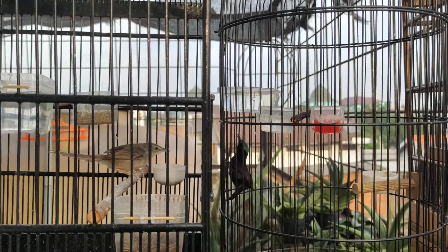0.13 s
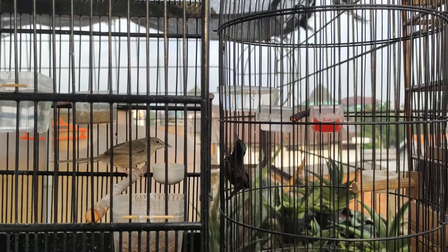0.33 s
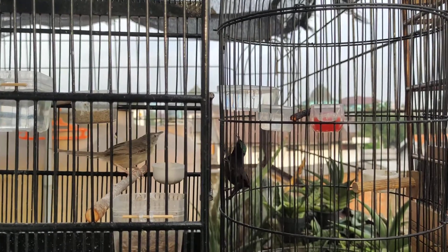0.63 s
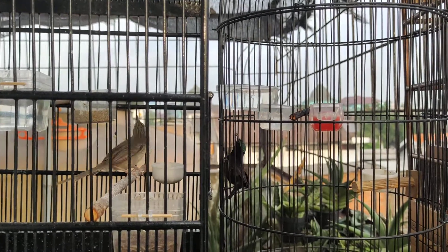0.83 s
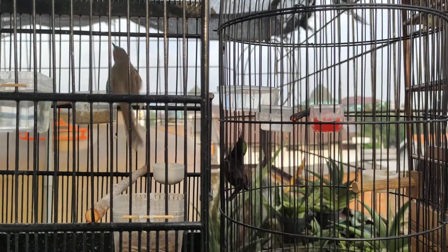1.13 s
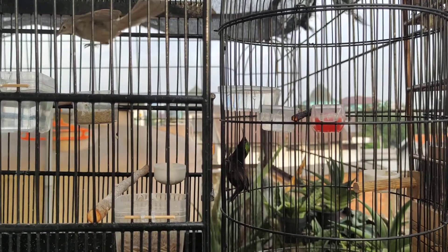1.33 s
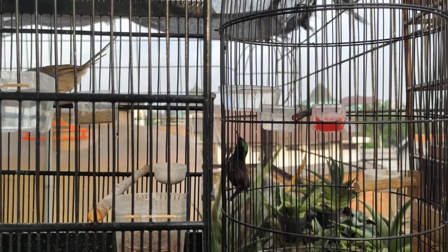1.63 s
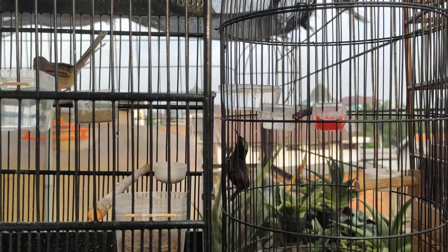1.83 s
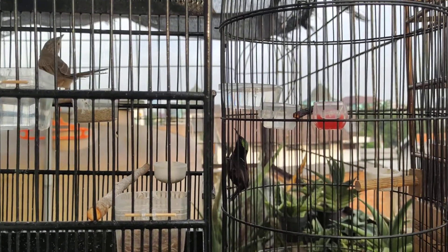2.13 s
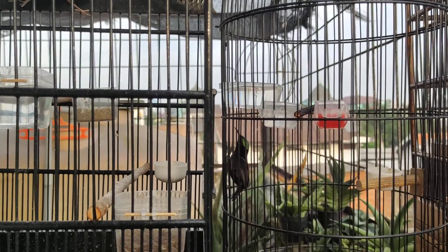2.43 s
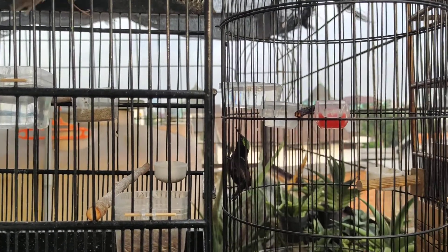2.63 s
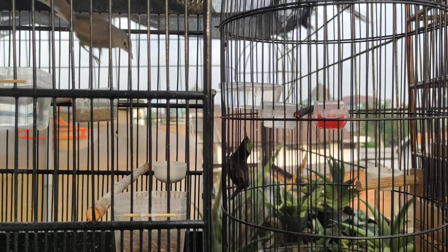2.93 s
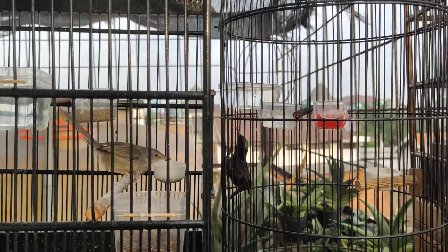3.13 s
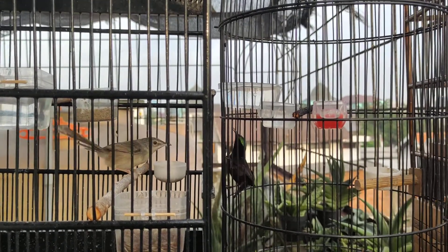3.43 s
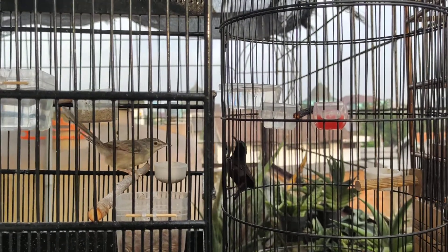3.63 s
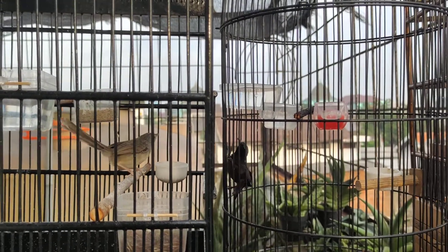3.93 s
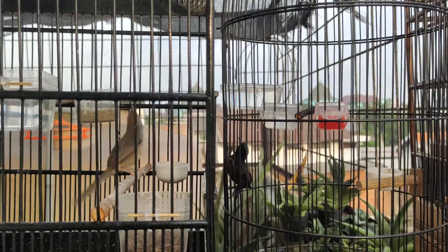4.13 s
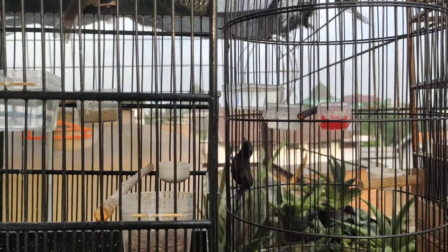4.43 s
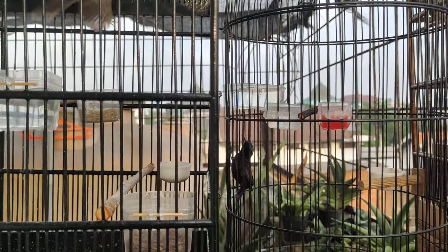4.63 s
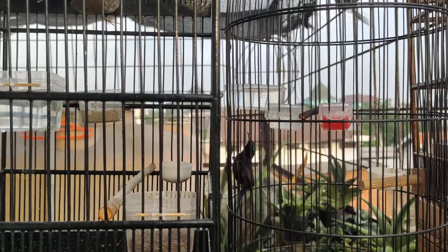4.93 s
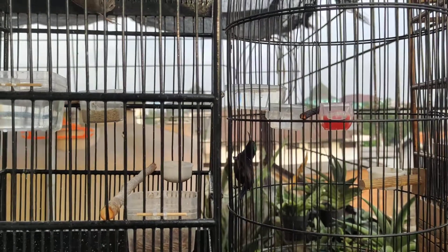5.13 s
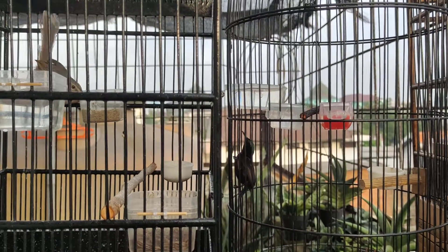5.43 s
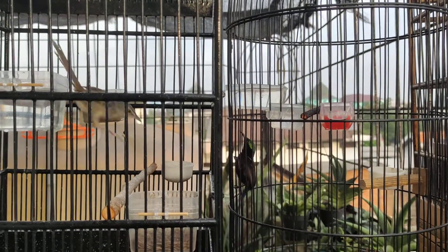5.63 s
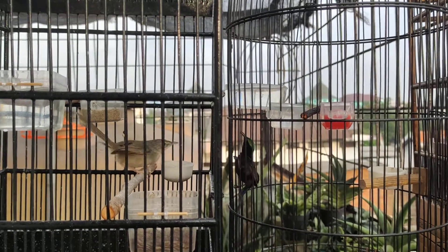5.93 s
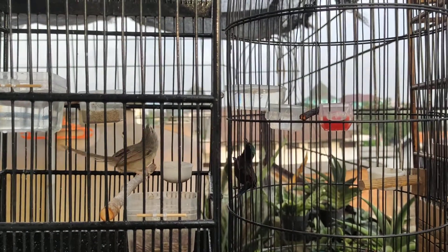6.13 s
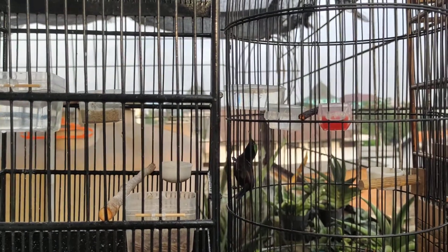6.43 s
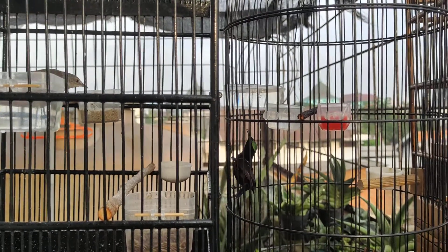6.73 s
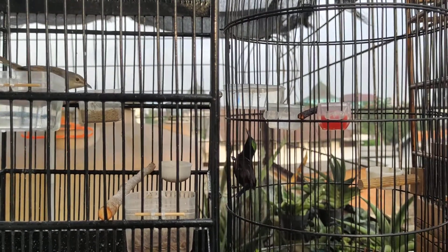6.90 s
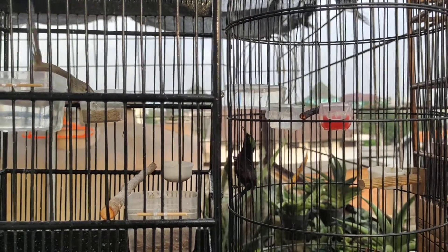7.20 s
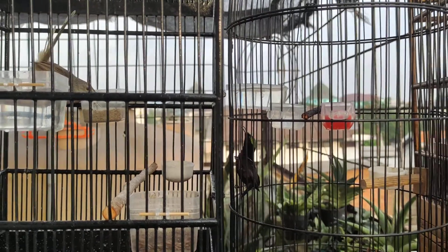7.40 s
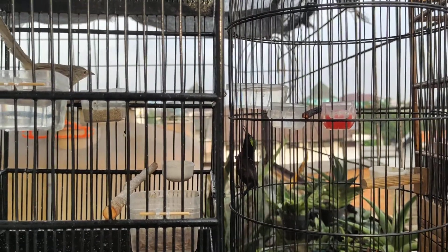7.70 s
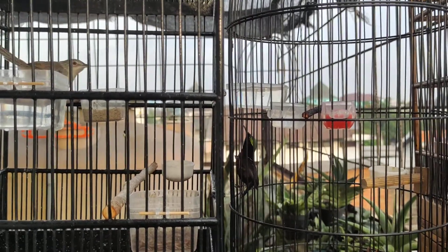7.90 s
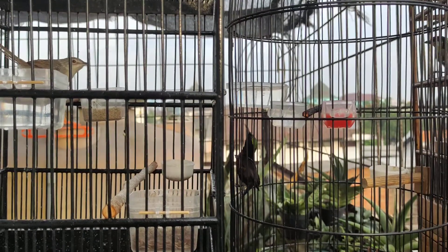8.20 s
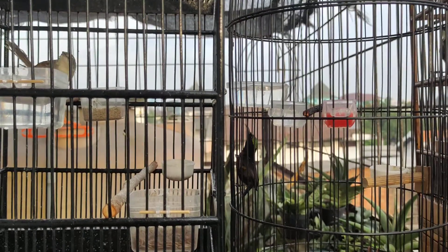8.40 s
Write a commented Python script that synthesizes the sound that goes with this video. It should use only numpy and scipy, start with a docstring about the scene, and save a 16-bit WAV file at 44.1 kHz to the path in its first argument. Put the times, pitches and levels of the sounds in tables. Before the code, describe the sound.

High bird chirps, short buzzing trills and sharp whistles, with light claw taps on cage bars, other birds and distant traffic.

```python
"""On a roofed terrace, over the rumble of a town, a small caged bird rustles and gives falling tsips,
then a buzzy trill from both sides of its syrinx. A neighbouring bird starts to churr, others whistle
farther off, and a distant engine swells and dies away. Claws strike the wire bars between more tsips
and a short trill. Midway the neighbour hisses and the caged bird gives a high arched whistle. Another
trill follows, the neighbour squawks once, and a run of arched whistles ends the scene."""
import sys
import numpy as np
from scipy import signal
from scipy.fft import rfft, irfft
from scipy.io import wavfile

SR = 44100
rng = np.random.default_rng(int(sys.argv[2]) if len(sys.argv) > 2 else 0)


def generate_wav(sig):
    """Save sig (samples, or channels by samples) to the path in sys.argv[1] as 16-bit PCM at SR."""
    pcm = np.round(np.clip(np.atleast_2d(sig).T, -1, 1) * 32767).astype(np.int16)
    wavfile.write(sys.argv[1], SR, pcm)


N = 377496

# Spectrum of the traffic, and the dulling of the left side: frequency_hz, gain_db
TRAFFIC_SPECTRUM = [(15, -51.5), (25, -28), (53, 1.5), (124, -6.5), (152, -4), (179, -11), (204, -6.5),
                    (233, -14), (289, -13), (352, -19.5), (389, -20.5), (515, -23.5), (682, -20.5),
                    (1300, -53), (1690, -100), (2860, -120)]
LEFT_SHADE = [(1500, 3.5), (3000, -2), (4000, -2.5), (4800, -18.5), (6000, -8.5), (7800, -4.5),
              (10000, -9.5), (13000, -13)]
# Outdoor hiss, rustles, claw ticks and calls, coloured by the microphone's 4.7 kHz resonance:
# frequency_hz, gain_db
AIR_AT_MIC = [(700, -0.5), (1300, -6), (2900, 3.5), (3800, -5), (4750, 7.5), (5600, 1.5), (6800, -9),
              (8000, -14.5), (10500, -19), (13500, -9.5), (15500, -3)]
RUSTLE_AT_MIC = [(800, -15), (2500, -5), (5000, 0.5), (10000, -8), (13700, 7), (15500, 4)]
TICK_AT_MIC = [(1000, -15.5), (2200, -12), (5200, 8.5), (10000, -7), (13500, 4.5)]
CALL_AT_MIC = [(1200, -18.5), (2800, -7.5), (4000, -5), (4750, 8.5), (6500, 0.5), (8000, -11),
               (8800, -10.5), (11000, -16.5), (12500, -7), (15500, -17)]
# Likeness of the background at left and right: frequency_hz, correlation
COHERENCE = [(30, 1), (120, 0.9624), (250, 0.907), (600, -0.246), (2000, -0.081)]
# Reflections from cage and wall: delay_s, gain_db
ECHOES = [(.0045, -17), (.0137, -14)]
# Distant bird whistles, plus a faint low horn-like tone and a brief low blip:
# start_s, length_s, level_db, first_hz, last_hz
FAR_TONES = [(0.062, 0.0227, -50, 1453, 1350), (0.403, 0.075, -46, 2912, 2776),
             (0.507, 0.1514, -38.5, 3020, 2373), (1.364, 0.0543, -44.5, 4615, 4997),
             (2.503, 0.243, -49, 4555, 4226), (4.299, 0.0742, -34, 3063, 2845),
             (4.377, 0.0842, -34.5, 2824, 2506), (4.537, 0.047, -53.5, 771.6, 808),
             (4.746, 0.046, -41.5, 2603, 3122), (4.853, 0.057, -34.5, 2796, 2964),
             (4.906, 0.14, -41, 2742, 2653), (5.115, 0.045, -45.5, 6327, 6523),
             (5.271, 0.11, -53.5, 8500, 7600), (7.211, 0.1144, -37, 2961, 3026)]
# The caged bird's falling notes: start_s, length_s, level_db, first_hz, last_hz
TSIPS = [(0.069, .016, -32, 4015, 1875), (0.2023, 0.03634, -18.5, 6000, 1714),
         (0.321, 0.03444, -14.5, 6003, 1694), (2.124, 0.0145, -26.5, 4055, 2407),
         (2.161, 0.0552, -24, 5250, 3197), (2.959, 0.0153, -27.5, 4040, 2662),
         (2.999, 0.0452, -24, 5844, 3020), (3.156, .036, -44.5, 5445, 3850), (3.31, .034, -20, 5956, 1707),
         (3.643, 0.0178, -25.5, 4028, 2487), (3.693, 0.0416, -21, 5960, 2297),
         (3.883, 0.0386, -39.5, 5580, 3200)]
# The neighbour's hisses: start_s, length_s, level_db, pitch_hz, fade_db_per_s, tilt_db_per_octave
HISSES = [(4.022, 0.195, -31.5, 6759, 28.5, 2.5), (4.213, 0.2293, -27.5, 6465, 127.5, -2.5)]
# Noise bands of a hiss: pitch_ratio, width_hz, gain_db
HISS_BANDS = [(0.741, 606, 1.5), (0.842, 400, -1), (1, 600, 4), (1.99, 1150, 2.5)]
# Feather movements: start_s, length_s, level_db
RUSTLES = [(0, 0.11, -44.5), (0.264, 1.289, -55.5), (2.123, 0.431, -54.5), (2.575, 0.296, -51),
           (2.942, 0.242, -45.5), (3.284, 0.224, -49), (4.824, 0.261, -49), (5.428, 0.329, -53),
           (6.247, 0.394, -56.5), (6.738, 0.361, -51), (7.451, 0.2, -49), (8.052, 0.26, -41)]
# Firm claw landings, the neighbour's calls and the caged bird's arched whistles: start_s, level_db
LANDINGS = [(0.2857, -35.5), (1.4945, -26.5), (1.7334, -40), (1.8321, -32), (1.8443, -30.5),
            (2.2141, -33.5), (2.283, -40), (2.368, -30.5), (3.0946, -25.5), (4.493, -36), (4.5243, -31.5),
            (4.538, -31.5), (4.6344, -37), (5.0412, -30.5), (5.5914, -31), (7.1047, -39), (8.079, -34.5),
            (8.1529, -29.5)]
CHURRS = [(.553, -35), (1.533, -35), (2.769, -31), (3.52, -34), (4.222, -30.5), (4.905, -33), (5.42, -34.5),
          (6.48, -35.5), (7.335, -35.5)]
SQUAWKS = [(6.622, -40.5)]
ARCHES = [(4.113, -19.5), (6.342, -21.5), (7.484, -21.5), (7.758, -21), (8.111, -21.5)]
# Runs of evenly spaced buzzes: first_start_s, last_start_s, level_db
TRILLS = [(.451, 1.2175, -25), (3.44, 3.696, -26.5), (5.945, 6.195, -27.5), (7.235, 7.235, -26.5)]
# One row per sounding side of the syrinx: first_hz, top_hz, last_hz, top_s, gain_db, top_gain_db
CHURR_VOICES = [(3630, 4450, 2400, .009, 2, 0), (4940, 5900, 3600, .009, -6, 0)]
SQUAWK_VOICES = [(1452, 1823, 1348, 0.0254, -2.07, 2.6)]
BUZZ_VOICES = [(2653.7, 4230, 2500, .0245, -1, 5.5), (4750, 6050, 4250, .027, -1, -13)]
ARCH_VOICES = [(4300, 8130, 4534, 0.0485, -0.88, 5.5)]

# Note shapes; bends above 1 round the top of the pitch arch
CHURR_FORM = dict(length_s=.052, attack_s=.00418, release_s=.00414, swell_db=-1, bends=(1.217, .9))
SQUAWK_FORM = dict(length_s=.07594, attack_s=.008, release_s=.0185, swell_db=0, bends=(1.257, 1.137))
BUZZ_FORM = dict(length_s=.06001, attack_s=.01853, release_s=.00373, swell_db=2, bends=(1, 1.2))
ARCH_FORM = dict(length_s=.07735, attack_s=.01203, release_s=.00983, swell_db=5.5, bends=(3.1, 1.473))
QUIET_DB = -23  # depth of a note's attack and release


def amp(db):
    return 10 ** (np.asarray(db) / 20)


def unit_rms(x):
    return x / np.sqrt(np.mean(abs(x) ** 2) + 1e-20)


def per_bin(points):
    """Interpolates a curve over log frequency at each Fourier bin."""
    hz, value = np.transpose(points)
    return np.interp(np.log(np.fft.rfftfreq(N, 1 / SR) + 1), np.log(hz + 1), value)


def add(mix, start_s, sound):
    part = mix[max(round(start_s * SR), 0):][:len(sound)]
    part += sound[:len(part)]


def colour(x, spectrum):
    """Linear filtering: multiplication in the frequency domain."""
    return irfft(rfft(x) * amp(per_bin(spectrum)), N)


def wander(n, hz):
    """Low-passed noise: smooth random motion of unit RMS."""
    lowpass = signal.butter(2, min(hz, SR / 4), fs=SR, output="sos")
    return unit_rms(signal.sosfilt(lowpass, rng.standard_normal(n + SR // 10))[-n:])


def town(rumble_db=-49.5, air_db=-56, air_left_db=-3):
    """Partial coherence: traffic rumble is alike on both sides in the bass, under a faint outdoor hiss."""
    common, separate = rfft(rng.standard_normal((2, N)))
    likeness = np.clip(per_bin(COHERENCE), -1, 1)
    pair = irfft(np.array([common, likeness * common + np.sqrt(1 - likeness ** 2) * separate]), N)
    rumble = amp(rumble_db + .3068 * wander(N, 12.6)) * unit_rms(colour(pair, TRAFFIC_SPECTRUM))
    air = amp(air_db + 1.83 * wander(N, 1.8)) * unit_rms(colour(pair, AIR_AT_MIC))
    return rumble + amp([[air_left_db], [0]]) * air


def engine(hz=78.96, db=-52):
    """Random modulation of a low tone: a distant engine drones unsteadily and dies away."""
    phase = 2 * np.pi * np.cumsum(hz * (1 + .0546 * wander(N, 9.56))) / SR
    swell_db = np.interp(np.arange(N) / SR, [0, .6, 1.6, 2.3, 4], [-7.5, 1.5, 4.5, -11.5, -21.5])
    return amp(db + swell_db + 2.45 * wander(N, 8.8)) * np.sin(phase)


def voice(hz, db, jitter, flutter_hz, drift=.00927, shimmer_db=3):
    """An unsteady oscillator: a phasor with random frequency and amplitude modulation."""
    n = len(hz)
    unsteady = 1 + jitter * wander(n, flutter_hz) + drift * wander(n, 41)
    phase = 2 * np.pi * np.cumsum(hz * unsteady) / SR
    edges = np.clip(np.minimum(np.arange(n), np.arange(n)[::-1]) / SR * 1000, 0, 1)  # 1 ms ramps
    return edges * amp(db + shimmer_db * wander(n, flutter_hz / 2)) * np.exp(1j * phase)


def far_tones(edge_db=-14):
    """Frequency modulation: distant bird whistles, a horn-like tone and a low blip glide and warble."""
    out = np.zeros(N)
    for start_s, length_s, db, first_hz, last_hz in FAR_TONES:
        progress = np.linspace(0, 1, round(length_s * SR))
        hz = first_hz + (last_hz - first_hz) * progress
        level_db = db + edge_db * abs(2 * progress - 1)
        add(out, start_s, voice(hz, level_db, jitter=.02, flutter_hz=160).real)
    return out


def arched(events, sides, length_s, attack_s, release_s, swell_db, bends):
    """Pitch and level contours of notes that climb and fall: (start_s, [(hz, db) of each voice])."""
    t = np.arange(0, length_s, 1 / SR)
    ends = np.maximum(1 - t / attack_s, 0) + np.maximum(1 - (length_s - t) / release_s, 0)
    envelope_db = QUIET_DB * ends + swell_db * t / length_s
    notes = []
    for start_s, db in events:
        detune, stray_db = rng.normal(0, [.011965, .8767])  # no two notes are quite alike
        voices = []
        for first_hz, top_hz, last_hz, top_s, side_db, top_db in sides:
            before = np.maximum(1 - t / top_s, 0)
            after = np.maximum((t - top_s) / (length_s - top_s), 0)
            hz = top_hz + (first_hz - top_hz) * before ** bends[0] + (last_hz - top_hz) * after ** bends[1]
            near_top = np.exp((hz / top_hz - 1) / .03)  # within about 3% of the top pitch
            voices.append((hz * (1 + detune), db + stray_db + side_db + envelope_db + top_db * near_top))
        notes.append((start_s, voices))
    return notes


def syrinx(notes, second_db, third_db, rasp_db, jitter, flutter_hz, fray_rad=0):
    """Nonlinear mixing: voices sharing one airway gain overtones and sum tones; turbulence adds rasp."""
    out = np.zeros(N)
    for start_s, voices in notes:
        wave = sum(voice(hz, db, jitter, flutter_hz) for hz, db in voices)
        n, rms = len(wave), np.sqrt(np.mean(abs(wave) ** 2))
        onset_chaos = fray_rad * np.linspace(1, 0, n) ** 6 * wander(n, 1655)  # soon settles
        wave = wave / rms * np.exp(1j * onset_chaos)
        tone = (wave + amp(second_db) * wave ** 2 + amp(third_db) * wave ** 3).real
        turbulence = unit_rms(np.diff(rng.standard_normal(n + 2), 2))  # lies above the voices
        add(out, start_s, rms * (tone + amp(rasp_db) * abs(wave) * turbulence))
    return out


def neighbour_hiss(ramp_s=.0149, sag_hz_per_s=810):
    """Narrow-band noise: breathy bands start quickly, then fade and sink in pitch together."""
    out = np.zeros(N)
    for start_s, length_s, db, hz, fade_db_per_s, tilt_db in HISSES:
        t = np.arange(0, length_s, 1 / SR)
        phase = 2 * np.pi * np.cumsum(hz - sag_hz_per_s * t) / SR
        bands = np.zeros(len(t))
        for ratio, width_hz, band_db in HISS_BANDS:
            band = sum(wander(len(t), width_hz / 2) * wave(ratio * phase) for wave in (np.cos, np.sin))
            bands += amp(band_db + tilt_db * np.log2(ratio)) * band
        edges = np.minimum(np.minimum(t, length_s - t) / ramp_s, 1)
        add(out, start_s, edges * amp(db - fade_db_per_s * t) * unit_rms(bands))
    return out


def neighbour_calls():
    """Strong jitter broadens each partial: rough two-voiced churrs and one hoarse nasal squawk."""
    churrs = syrinx(arched(CHURRS, CHURR_VOICES, **CHURR_FORM),
                    second_db=-44.5, third_db=-57, rasp_db=-24.5, jitter=.07, flutter_hz=900)
    squawk = syrinx(arched(SQUAWKS, SQUAWK_VOICES, **SQUAWK_FORM),
                    second_db=-3.5, third_db=-15, rasp_db=-14, jitter=.075, flutter_hz=700)
    return colour(churrs, CALL_AT_MIC) + squawk


def feathers(grain_db=6, grain_hz=45):
    """Amplitude-modulated noise: uneven swishes as the bird flits between perches."""
    out = np.zeros(N)
    for start_s, length_s, db in RUSTLES:
        n = round(length_s * SR)
        swish = unit_rms(rng.standard_normal(n) * amp(grain_db * wander(n, grain_hz)))
        add(out, start_s, amp(db) * signal.windows.tukey(n, .7) * swish)
    return colour(out, RUSTLE_AT_MIC)


def claws(trim_db=-1, t60_s=.0242, touches_per_s=3, touch_db=-37):
    """Impact excitation: each touch shakes many wires at once in a bright, fast-decaying burst."""
    out, t = np.zeros(N), np.arange(SR // 8) / SR
    # lighter touches come by chance while the bird moves
    touches = [(start_s + length_s * when, touch_db) for start_s, length_s, _ in RUSTLES
               for when, chance in rng.random((8, 2)) if 8 * chance < touches_per_s * length_s]
    for start_s, db in LANDINGS + touches:
        add(out, start_s, amp(db + trim_db - 60 * t / t60_s) * rng.standard_normal(len(t)))
    return colour(out, TICK_AT_MIC)


def dives(bend=1.45, attack_s=.00166):
    """Power-law sweeps: each one-voiced tsip falls ever faster and is loudest part-way down."""
    notes = []
    for start_s, length_s, db, first_hz, last_hz in TSIPS:
        progress = np.linspace(0, 1, round(length_s * SR))
        hz = first_hz + (last_hz - first_hz) * progress ** bend
        swell_db = np.interp(progress, [0, .409, 1], [-20.5, 0, -9])
        attack_db = QUIET_DB * np.maximum(1 - progress * length_s / attack_s, 0)
        notes.append((start_s, [(hz, db + swell_db + attack_db)]))
    return notes


def caged_bird(trill_step_s=.127):
    """Biphonation: buzzes use both sides of the syrinx; one-voiced whistles and tsips are nearly pure."""
    beats = [(start_s, db) for first_s, last_s, db in TRILLS
             for start_s in np.linspace(first_s, last_s, round((last_s - first_s) / trill_step_s) + 1)]
    buzzes = syrinx(arched(beats, BUZZ_VOICES, **BUZZ_FORM),
                    second_db=-5.5, third_db=-23, rasp_db=-2.5, jitter=.009, flutter_hz=900, fray_rad=3.8)
    whistles = syrinx(arched(ARCHES, ARCH_VOICES, **ARCH_FORM),
                      second_db=-27, third_db=-93, rasp_db=-40, jitter=.0031, flutter_hz=581)
    tsips = syrinx(dives(), second_db=-20.5, third_db=-73, rasp_db=-15.5,
                   jitter=.0051, flutter_hz=704, fray_rad=.99)
    return colour(buzzes + whistles + tsips, CALL_AT_MIC)


def terrace(x, direct_db, early, late, right_lag_s=.00029):
    """Reverberation: cages and roof scatter early, houses late; each decay is (level_db, t60_s)."""
    t = np.arange(SR * 3 // 4) / SR
    decay = sum(amp(db - 60 * t / t60_s) * np.sqrt(np.log(1e6) / (SR * t60_s))
                for db, t60_s in (early, late))
    build_up = np.clip(t / .00492, 0, 1)
    response = rng.standard_normal((2, len(t))) * decay * build_up
    for delay_s, db in [(.00044, .12)] + ECHOES:  # direct path, then reflections
        add(response[0], delay_s, amp([direct_db + db]))
        add(response[1], delay_s + right_lag_s, amp([direct_db + db]))
    left, right = signal.fftconvolve(x[None], response, axes=1)[:, :N]
    return np.array([colour(left, LEFT_SHADE), right])


def scene():
    """Superposition: the farther the source, the more reverberation outweighs its direct sound."""
    near = terrace(caged_bird() + claws() + feathers(), direct_db=-1, early=(-3.5, .071), late=(-27.5, .292))
    beside = terrace(neighbour_calls() + neighbour_hiss(), direct_db=-6, early=(1, .0984), late=(-22, .66))
    far = terrace(far_tones(), direct_db=-8, early=(2, .174), late=(-16.5, .89))
    return near + beside + far + town() + engine()


def record(dry):
    """Band limiting: a linear-phase low-pass cuts off at 15.6 kHz."""
    lowpass = signal.firwin(401, 15600, window=("kaiser", 9), fs=SR)
    return signal.oaconvolve(dry, lowpass[None], "same", axes=1)


dry = scene()
out = record(dry)
generate_wav(out)
```